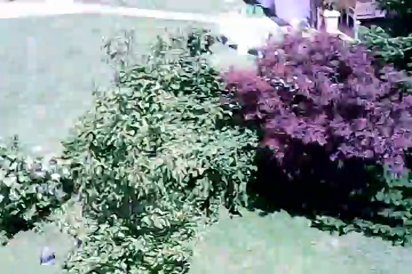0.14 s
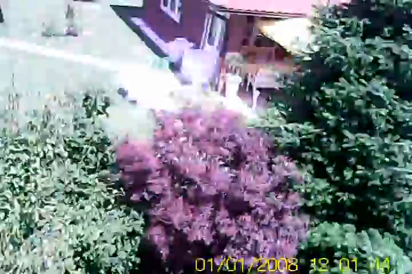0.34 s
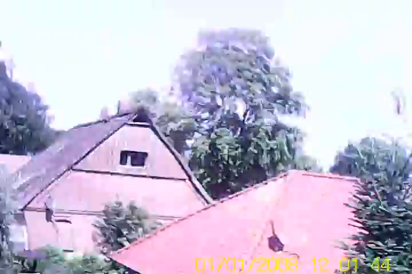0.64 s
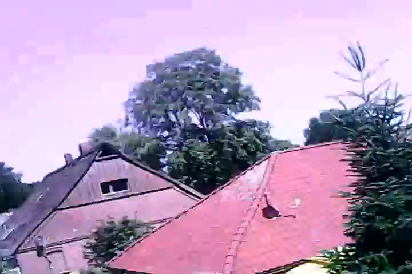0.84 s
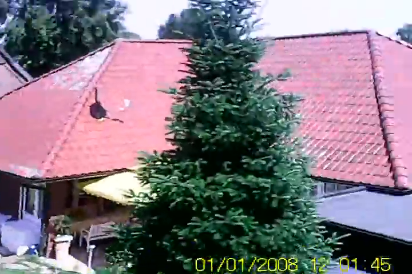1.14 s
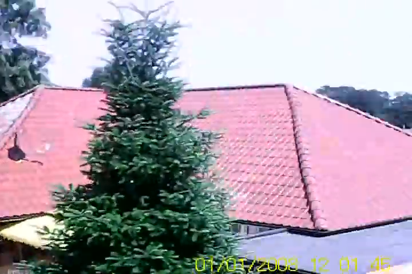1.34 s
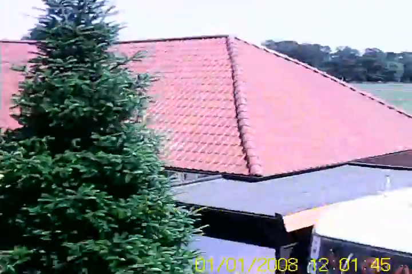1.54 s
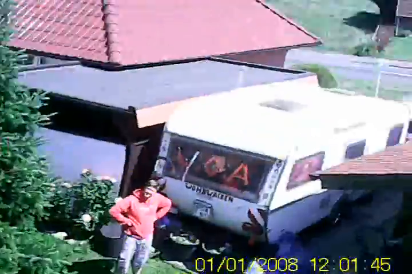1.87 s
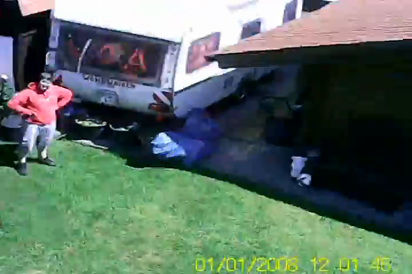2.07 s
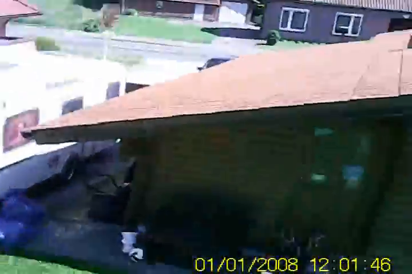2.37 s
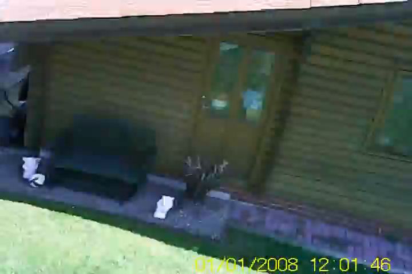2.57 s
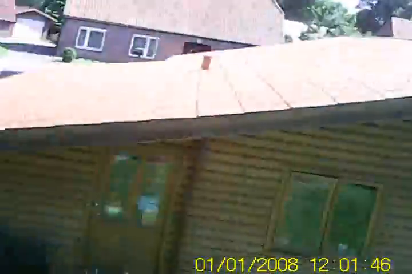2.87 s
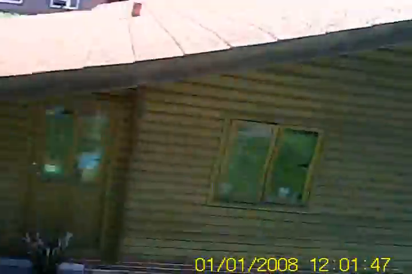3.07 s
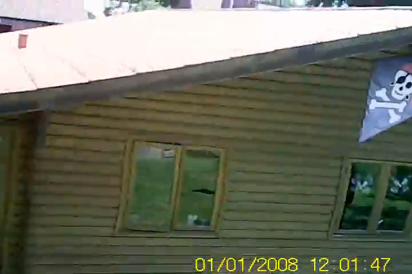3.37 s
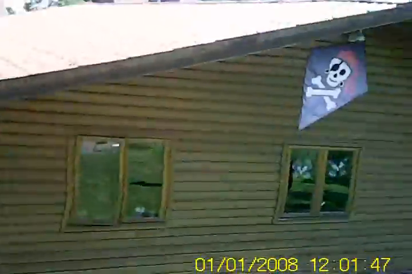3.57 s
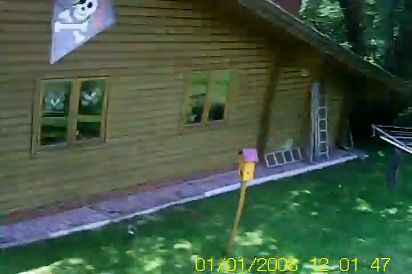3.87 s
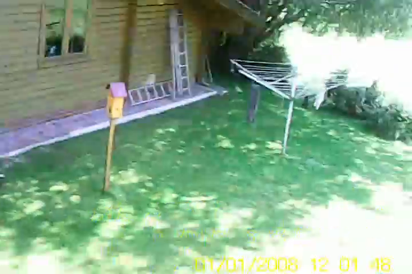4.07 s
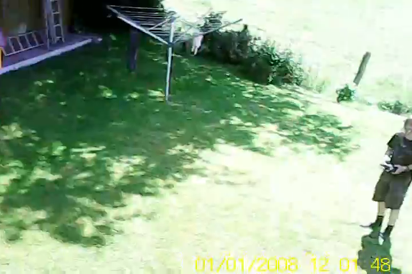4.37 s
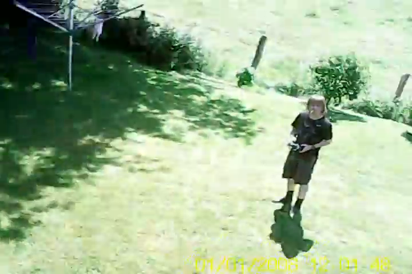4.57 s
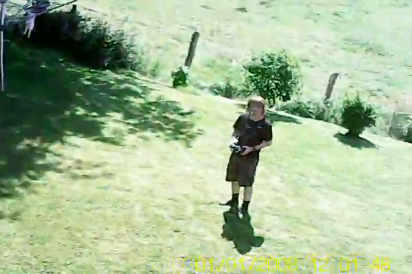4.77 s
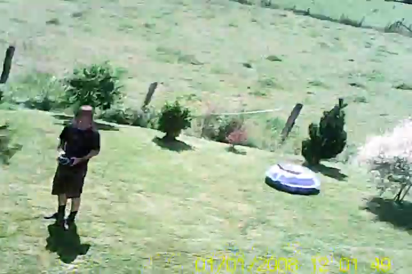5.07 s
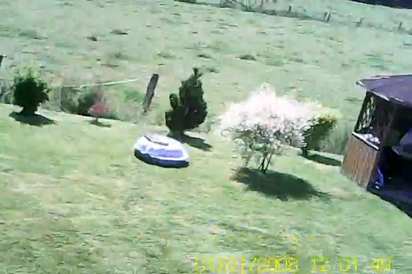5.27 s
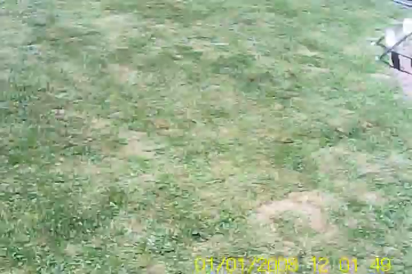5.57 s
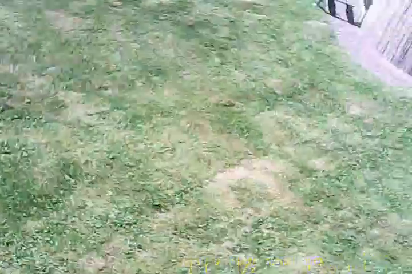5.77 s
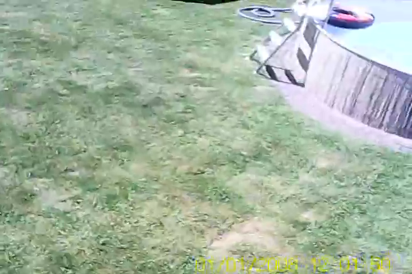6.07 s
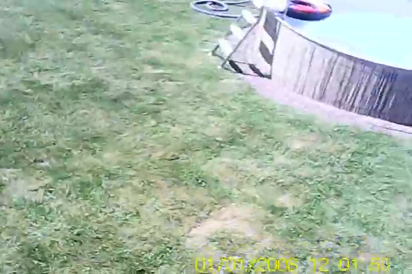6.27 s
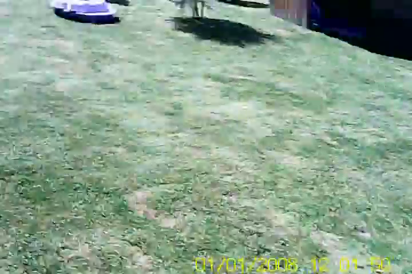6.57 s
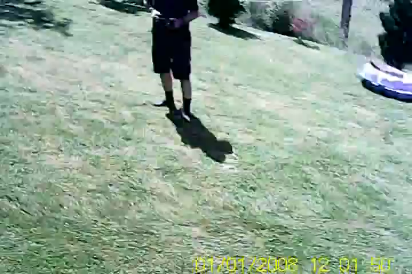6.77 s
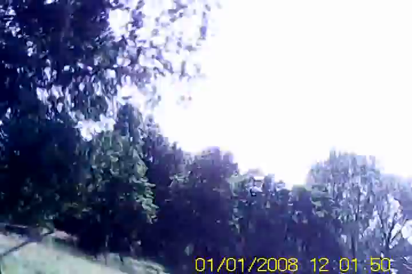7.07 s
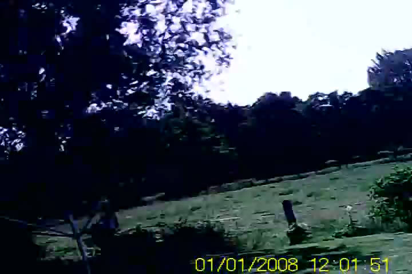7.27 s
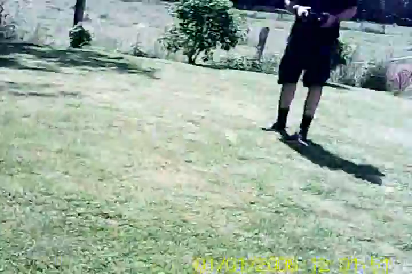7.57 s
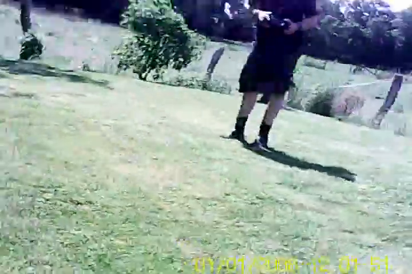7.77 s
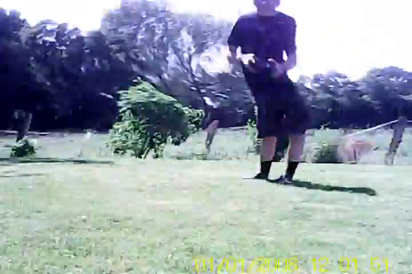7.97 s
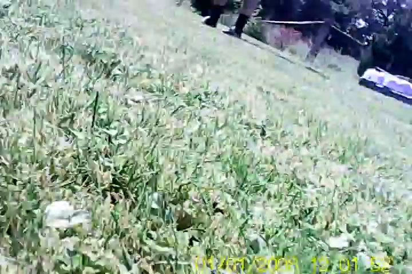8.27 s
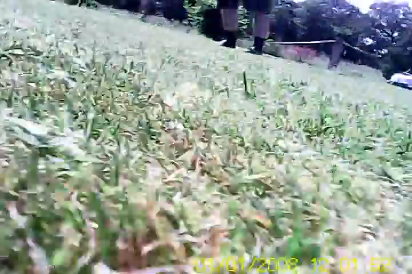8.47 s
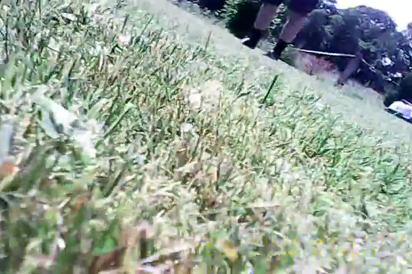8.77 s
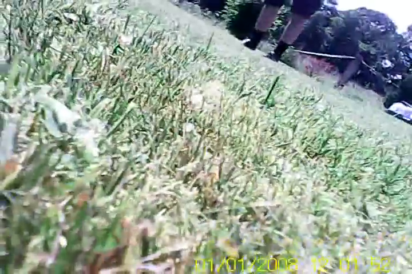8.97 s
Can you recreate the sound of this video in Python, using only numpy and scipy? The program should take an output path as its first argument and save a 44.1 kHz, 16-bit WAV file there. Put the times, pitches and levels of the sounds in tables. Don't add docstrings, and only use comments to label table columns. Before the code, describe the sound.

A microphone fixed to a small model helicopter picks up two shrill, slightly clashing gear whines, gritty plastic rattle, fast low blade thumps and fluttering downwash. Pitch wavers with steering for eight seconds. Then it lands outdoors: a soft bump, a burst of crisp blade clicks in grass, and unloaded gears whispering down to near silence.

```python
import sys
import numpy as np
from scipy import signal
from scipy.fft import rfft, irfft, next_fast_len
from scipy.io import wavfile
from scipy.ndimage import uniform_filter1d

SR = 44100
rng = np.random.default_rng(int(sys.argv[2]) if len(sys.argv) > 2 else 0)


def voltage_ratio(decibels):
    exponent = np.asarray(decibels, float) / 20
    return 10 ** exponent


def transcribe(u):
    v = np.clip(np.atleast_2d(u).T, -1, 1)
    q = np.round(v * 32767).astype(np.int16)
    wavfile.write(sys.argv[1], SR, q)


N = 403074
t = np.arange(N) / SR
coarse = t[::100]

TEETH = 69
STOP_S = 8.05
COAST_S = 8.02

# [Hz, dB]
COASTING_SPECTRUM = [(180, -41), (300, -19), (639, -19.5), (920, -13), (1440, -17.5), (2110, -6),
                     (2590, -11.5), (2990, 0), (3260, -7.5), (3670, -0.5), (4120, -3.5), (5120, -27.5),
                     (6100, -18), (9720, -24), (12600, -61), (21400, -120)]


def trains():
    # [s, Hz, dB]
    throttle = [(0, 1999, -37), (.4, 1967, -38.5), (1.0, 2011, -31), (1.38, 2047, -32), (2.7, 2081, -32.5),
                (3.27, 2063, -33), (3.75, 2045, -33.5), (4.2, 2023, -32), (4.8, 1977, -35.5),
                (5.38, 2013, -33.5), (5.75, 1957, -41), (6.07, 1950, -36), (6.35, 2038, -35.5),
                (6.69, 2064, -32.5), (7.05, 2016, -37), (7.78, 2152, -34.5), (7.89, 2075, -30),
                (8.04, 1628, -59)]
    # [s, ratio, s, dB]
    steering = [(.1, -.046, .3, -3), (.52, -.028, .14, 1), (3.62, -.02, .12, 0.5), (3.79, -.07, .08, -2),
                (4.88, -.015, .1, -1.5), (5.03, -.058, .07, -1.5), (5.86, -.03, .1, -1.5),
                (6.1, -0.048, 0.14, -3), (6.601, .027, .15, -1), (7.08, -0.027, .1, -0.5),
                (7.601, .04, .3, -1)]
    first_level_db, cut_s, cut_db_per_s = -36, 7.88, -110
    hz, second_db = columns(throttle)
    steer = fine(sum(share * bell(s, spread) for s, share, spread, _ in steering))
    change_db = fine(sum(db * bell(s, spread) for s, _, spread, db in steering))

    calm_hunt, low_hunt, low_from_s = .003, .009, 6.2
    hunt = np.where(t < low_from_s, calm_hunt, low_hunt)
    first_hz = hz * (1 + steer + hunt * drift(8.))
    second_hz = hz * (1 + (hunt - calm_hunt) * drift(12.))
    first_db = first_level_db + change_db + cut_db_per_s * np.maximum(t - cut_s, 0)
    return first_hz, first_db, second_hz, second_db, abs(steer)


def gears(first_hz, first_db, second_hz, second_db, steer):
    # [ratio, dB, Hz]
    first_orders = [(1, -4, 54), (2, 8.5, 95), (3, 5, 180), (4, -3, 260), (5, -7, 640)]
    # [ratio, dB, Hz]
    second_orders = [(.47, -26.5, 30.9), (.626, -23.5, 22.8), (1.001, 2, 39), (1.62, -2.5, 37.4),
                     (2, 2, 50.9)]
    # [s, dB]
    rattle_curve = [(0, -24.5), (1.1, -26), (2.2, -25), (4.5, -26), (5.9, -25), (7.2, -24), (7.72, -23.5),
                    (8.03, -30.5)]
    # [Hz, dB]
    frame_spectrum = [(290, -28), (500, -18), (588, -24.5), (1570, -23.5), (2010, -6), (2710, -14),
                      (3100, -1.5), (3930, 3), (4850, -18), (6370, -8.5), (7400, -15), (8690, -11.5),
                      (9720, -16), (12600, -50.5), (21400, -120)]
    release_s = 5.912
    turns = np.cumsum(first_hz) / SR / TEETH
    turns = turns - np.interp(release_s, t, turns)
    shake = np.clip(.245 + 1.3 * steer, 0, 1.5)
    load = throb(turns, 1.01 * shake, 0.36 * shake, 0.21 * shake)
    load = load / np.sqrt(uniform_filter1d(load ** 2, size=6000))

    knocks = rng.standard_normal(N) * voltage_ratio(1.2 * drift(400.))
    rattle_gain = voltage_ratio(columns(rattle_curve)[0] + 2.0) * lasting(STOP_S) * load ** 0.6
    rattle = rattle_gain * evened(colour(knocks, frame_spectrum))

    first = whine(first_hz, first_db, first_orders, load, steady=.6, worn=1.8, wobble=.012)
    second = whine(second_hz, second_db, second_orders, load ** .2, steady=2.3, worn=.4, wobble=.004)
    boost = [(500, -10.0), (3400, 10.5), (3620, 14.0), (3780, 14.5), (3950, 7.0), (4300, -6.0), (10000, 6.5)]
    return rattle + colour(first, boost) + second


def whine(hz, level_db, orders, load, steady, worn, wobble):
    turns = np.cumsum(hz) / SR / TEETH
    speed = 1 + wobble * np.sin(2 * np.pi * turns) + 0.002987 * drift(25.2)
    phase = 2 * np.pi * np.cumsum(hz * speed) / SR
    tone = np.zeros(N)
    for multiple, db, blur_hz in orders:
        chance = drift(blur_hz) + 1j * drift(blur_hz)
        contact = evened(steady + worn * wear(turns, count=12) + chance)
        tone += voltage_ratio(db) * (contact * np.exp(1j * multiple * phase)).real
    return voltage_ratio(level_db) * lasting(STOP_S) * load * tone * np.sqrt(2)


def throb(turns, once, twice, fourth):
    depths = [once, twice, 0.32 * once, fourth, 0.67 * fourth, .45 * fourth]
    return np.exp(-sum(a * np.sin(2 * np.pi * k * turns) for k, a in enumerate(depths, start=1)))


def wear(turns, count):
    bumps = rng.standard_normal((2, count)) + 1j * rng.standard_normal((2, count))
    one, other = (np.interp(turns, np.arange(count) / count, b, period=1) for b in bumps)
    trade = drift(1.3)
    return one * np.cos(trade) + other * np.sin(trade)


def coasting():
    # [Hz, Hz, s]
    rundown = [
        (1500, 120, .63),
        (1390, -110, .55),
    ]
    since = np.maximum(t - COAST_S, 0)
    first_hz, second_hz = (aim_hz + (hz - aim_hz) * np.exp(-since / lag) for hz, aim_hz, lag in rundown)

    rub_s, rub_every_s = 8.08, .245
    rub_db = 3.5 * np.exp(-since / .45) * np.cos(2 * np.pi * (t - rub_s) / rub_every_s)
    whisper_db = -34 - 12 * since + rub_db
    hiss = evened(colour(rng.standard_normal(N), COASTING_SPECTRUM))
    treble = signal.sosfiltfilt(signal.butter(4, 4600, "high", fs=SR, output="sos"), hiss)
    dulled = hiss - np.clip(.3 * since, 0, .8) * treble
    whisper = voltage_ratio(whisper_db + 1.8 * drift(50.)) * dulled

    hum_rise_s = .45
    hum_db = -62 - 14 * np.maximum(1 - since / hum_rise_s, 0)
    meshes = [first_hz, 2 * first_hz, 3 * first_hz, second_hz]
    hum = sum(np.sin(2 * np.pi * np.cumsum(hz) / SR) * voltage_ratio(hum_db - 11 + 5 * drift(9.)) for hz in meshes)
    return (whisper + hum) * np.clip(1 + (t - COAST_S) / .04, 0, 1)


def blades(first_hz, second_hz):
    # [s, s, dB, dB, dB]
    wash = [(-.05, 0.11, -26, 1, -33), (0.135, .27, -25, 0.5, -31.5), (0.574, 1.177, -24, -2, -40),
            (1.89, 0.77, -19, -17, -34), (2.783, 0.616, -23, -1.5, -35), (3.525, 0.29, -24.5, 1.5, -32.5),
            (3.85, 1.04, -23, 0.5, -37), (4.982, 0.34, -24, 1.5, -35), (5.39, .68, -35.5, -1, -36.5),
            (6.559, 0.34, -28, 10, -36.5), (7.069, .35, -22, -1, -32.5), (7.496, 0.29, -24, 0.5, -32.5),
            (7.969, 0.097, -22, -2.5, -41)]
    mesh_per_pass, pass_s, last_pass_s = 34.1, .2198, 8.15
    first_share = .75
    lee_db, lee_overtones_db, linger_s = -44, -47, 0.045
    sharp = 1.84
    passes = np.cumsum(first_share * first_hz + (1 - first_share) * second_hz) / (mesh_per_pass * SR)
    phase = 2 * np.pi * (passes - np.interp(pass_s, t, passes))

    push, overtones = voltage_ratio(lee_db), voltage_ratio(lee_overtones_db)
    for s, length, thump_db, sag_db, overtones_db in wash:
        sagging_db = thump_db + sag_db * (coarse - s) / length
        push = push + fine(voltage_ratio(sagging_db) * spell(s, length))
        overtones = overtones + fine(voltage_ratio(overtones_db) * spell(s, length + linger_s))

    bent = phase + .13 * drift(10.)
    edge = sum(np.exp(-(k - 2) / sharp) * 2 / k * np.sin(k * bent + 0.33) for k in range(2, 10))
    slow = voltage_ratio(-20.0) * np.sin(phase / 2)
    thump = push * voltage_ratio(1.0 * drift(4.)) * (np.sin(phase + 0.59) + slow)
    thump += overtones * voltage_ratio(2.3 * drift(2.84) + 1.7 * drift(32.0)) * edge
    thump[:SR] += slap(phase[:SR])
    return -np.sqrt(2) * lasting(last_pass_s) * thump


def slap(phase):
    peak_s, peak_db, rise_db_per_s, fall_db_per_s = .22, -21.5, 85, 90
    u = t[:len(phase)] - peak_s
    crisp = 6.5 + 3.5 * np.exp(-(u / .05) ** 2) + 1.2 * drift(30.)[:len(phase)]
    cracks = sum(np.exp(-k / crisp) * np.sin(k * phase - .3) / k ** 0.45 for k in range(3, 26))
    return voltage_ratio(peak_db + np.minimum(rise_db_per_s * u, -fall_db_per_s * u)) * cracks


def strikes():
    # [s, dB, Hz, s]
    hits = [(7.913, -14, 3960, .014), (7.947, -11.5, 3880, 0.0059), (7.972, -17, 3820, .012),
            (7.986, -16, 3453, 0.013), (7.998, -10, 3296, .010), (8.029, -16, 3170, 0.0029),
            (8.045, -14.5, 2988, .009), (8.072, -19, 3600, .0094), (8.096, -9.5, 4080, 0.0078),
            (8.126, -10, 3740, .014), (8.150, -14.5, 3570, .011), (8.192, -10.5, 4150, .013),
            (8.22, -20.5, 3930, 0.0076), (8.234, -20, 3900, .015), (8.261, -12.5, 3790, 0.016),
            (8.295, -28.5, 3620, .01), (8.332, -13.5, 3820, .01), (8.362, -18, 3860, 0.011),
            (8.392, -22, 3820, 0.019), (8.42, -21.5, 3800, 0.0076), (8.44, -16, 3900, .012),
            (8.473, -23, 3850, .018), (8.507, -28, 3570, 0.0088), (8.512, -31, 3900, 0.015),
            (8.548, -25, 3900, 0.012), (8.557, -22.5, 3640, 0.04), (8.668, -29, 3820, .012),
            (8.925, -34.5, 3020, 0.013)]
    lower_rings = [2033, 2380, 2820, 3110]
    # [s, dB, s]
    skid_bump = (7.985, -14.0, .025)
    scrape, ring = np.zeros(N), np.zeros(N)
    u = np.arange(2000) / SR
    for (s, peak_db, hz, length), lower_hz in zip(hits, rng.choice(lower_rings, len(hits))):
        at = round(s * SR)
        shape = voltage_ratio(peak_db) * np.sin(np.pi * np.clip(u / max(length, .003), 0, 1) ** 0.72) ** 1.5
        parts = np.sin(2 * np.pi * hz * u) + 0.31 * np.sin(2 * np.pi * lower_hz * u)
        parts += 0.07 * np.sin(np.pi * lower_hz * u)
        scrape[at:at + len(u)] += shape
        ring[at:at + len(u)] += shape * parts

    tilt = [(500, -5.0), (1200, 3.0), (2200, 1.5), (3000, 5.5), (9000, 10.5)]
    grass = evened(colour(colour(rng.standard_normal(N), COASTING_SPECTRUM), tilt))
    thud = colour(scrape, [(20, -21.0), (70, -1.2), (130, -7.0), (300, -24.0)])

    bump_s, bump_db, bump_length_s = skid_bump
    since = np.maximum(t - bump_s, 0) / bump_length_s
    bump = voltage_ratio(bump_db) * 3 * since * (1 - 0.22 * since) * np.exp(-since)
    return voltage_ratio(-14.0) * thud + voltage_ratio(-10.5) * scrape * grass + voltage_ratio(-7.0) * ring + bump


def wind():
    # [Hz, dB]
    flutter_spectrum = [(18, -38.5), (30, -6), (70, -6.5), (167, -12), (355, -17.5), (695, -35),
                        (888, -28.5), (1500, -35.5), (1950, -49.5), (3300, -120)]
    # [s, dB]
    downwash = [(0, -37), (3.8, -38.5), (5.3, -40.5), (6.4, -37), (6.72, -34.5), (7.24, -40), (7.36, -32),
                (7.56, -32), (7.88, -33), (8.04, -47.5), (8.55, -67), (9.14, -73)]
    # [s, dB, s]
    gust_list = [(.49, -32, 0.034), (1.24, -28.5, .04), (1.5, -27.5, 0.088), (2.109, -27, .07),
                 (3.6, -34, .1), (4.33, -27, .05), (4.75, -35, .3), (5.26, -30.5, .05), (5.52, -35, 0.073),
                 (6.601, -30, .08), (6.86, -30, 0.042), (7.15, -29.5, 0.11), (7.32, -23.5, 0.047),
                 (7.8, -30, 0.11), (7.97, -19.5, .07)]
    settle_s = 8.04
    flutter_db = columns(downwash)[0] + 1.1 * drift(7.9)
    calm_db = np.where(t < settle_s, -43 + 3. * drift(3.), -29 - 37 * (t - settle_s))
    gusts = voltage_ratio(calm_db) + fine(sum(voltage_ratio(db) * bell(s, spread) for s, db, spread in gust_list))

    lumps = voltage_ratio(2.33 * drift(34.0))
    eddies = colour(rng.standard_normal(N) * lumps, flutter_spectrum)
    roar_spectrum = [(150, -29.5), (350, -1.5), (700, -5.0), (1100, -13.5), (2000, -42.5)]
    roar = colour(rng.standard_normal(N) * lumps ** 0.84, roar_spectrum)
    heave = colour(rng.standard_normal(N), [(1, -45.0), (5, 4.0), (30, 7.0), (45, -22.0), (90, -69.5)])
    turbulence = voltage_ratio(flutter_db + 5) * evened(eddies) + voltage_ratio(1.65 * flutter_db + 14.5) * evened(roar)
    return turbulence + gusts * evened(heave)


def evened(x):
    return x / np.sqrt(np.mean(abs(x) ** 2) + 1e-20)


def columns(rows):
    s, *values = np.transpose(rows)
    return [np.interp(t, s, v) for v in values]


def fine(slow):
    return np.interp(t, coarse, slow)


def bell(s, spread):
    return np.exp(-((coarse - s) / max(spread, .01)) ** 2)


def spell(s, length):
    return np.clip(.5 + np.minimum(coarse - s, s + length - coarse) / 0.16, 0, 1)


def lasting(end):
    return np.clip((end - t) / .03, 0, 1)


def drift(width_hz):
    smooth = signal.butter(2, max(width_hz, .5), fs=SR, output="sos")
    return evened(signal.sosfilt(smooth, rng.standard_normal(N)))


def colour(x, points):
    f, db = np.transpose(points)
    size = next_fast_len(N + SR // 2, real=True)
    hz = np.fft.rfftfreq(size, 1 / SR)
    gain = voltage_ratio(np.interp(np.log(hz + 1), np.log(f + 1), db))
    return irfft(rfft(x, size) * gain, size)[:N]


def scene():
    first_hz, first_db, second_hz, second_db, steer = trains()
    drive = gears(first_hz, first_db, second_hz, second_db, steer) + coasting()
    return (drive + blades(first_hz, second_hz) + wind() + strikes())[None]


def top_cut(x):
    return signal.sosfilt(signal.butter(12, 12900, fs=SR, output="sos"), x)


def record(dry):
    # [Hz, dB]
    mirror_spectrum = [(11000, -120), (11900, -67), (12080, -27), (12500, -42), (13000, -70), (21400, -120)]
    edge_hz = 9950
    lowpass = signal.firwin(801, edge_hz, window=("kaiser", 9), fs=SR)
    low = signal.oaconvolve(np.clip(dry, -.7, .7), lowpass[None], "same")
    mirror = colour(low[0] * (-1.) ** np.arange(N), mirror_spectrum)
    return top_cut(low + mirror - .0085)


dry = scene()
out = record(dry)
transcribe(out)
```